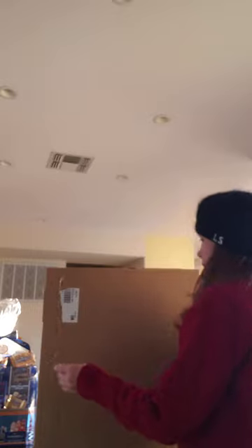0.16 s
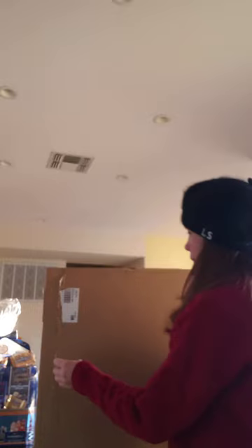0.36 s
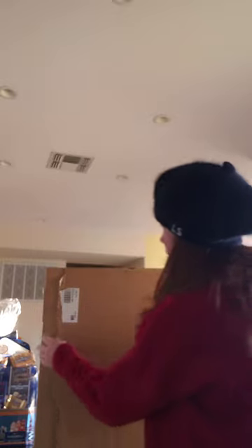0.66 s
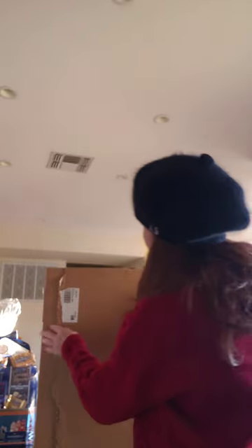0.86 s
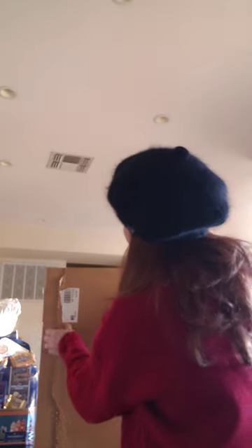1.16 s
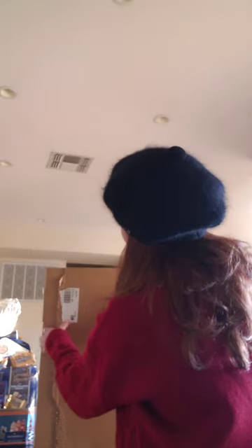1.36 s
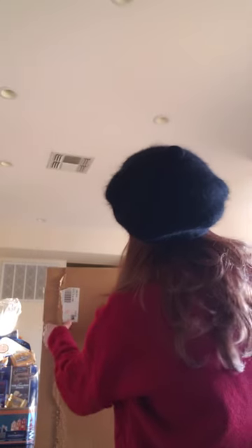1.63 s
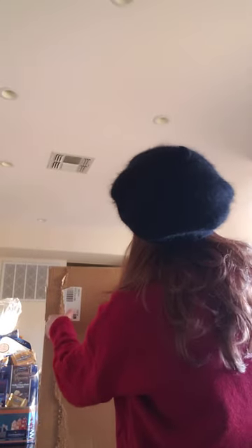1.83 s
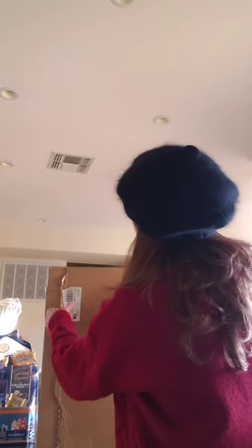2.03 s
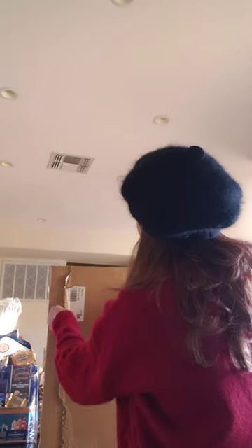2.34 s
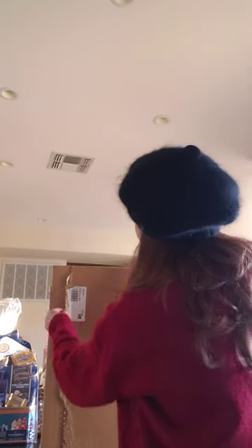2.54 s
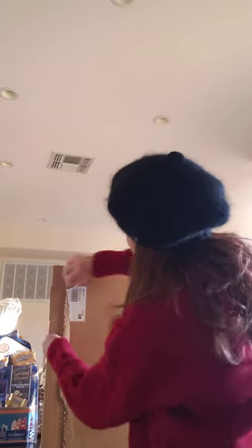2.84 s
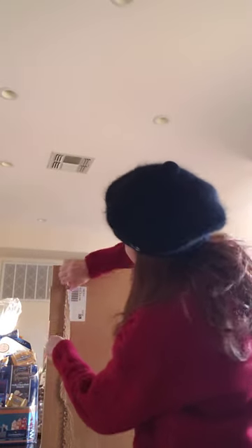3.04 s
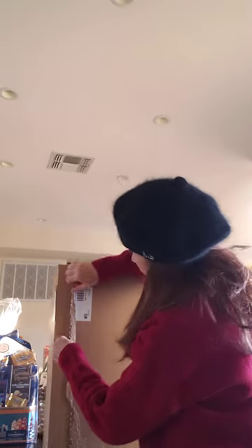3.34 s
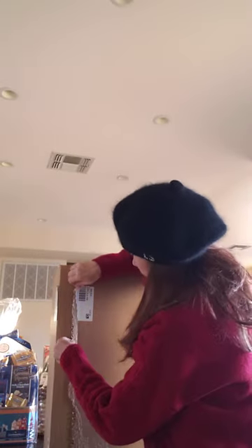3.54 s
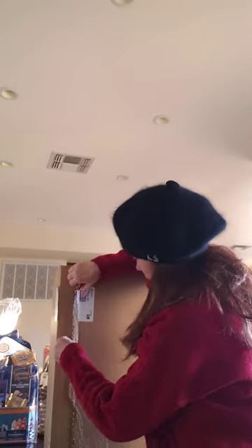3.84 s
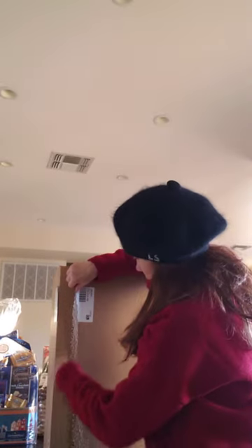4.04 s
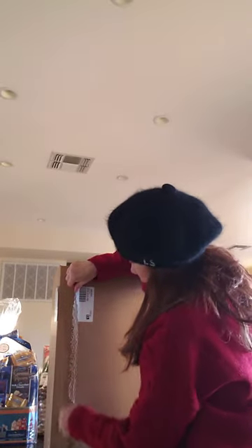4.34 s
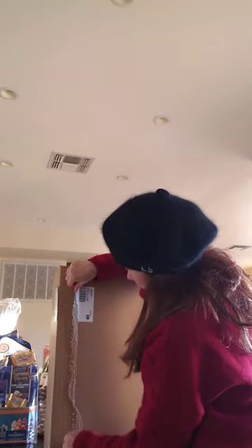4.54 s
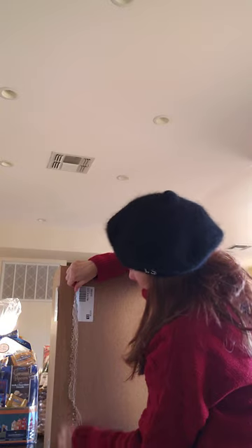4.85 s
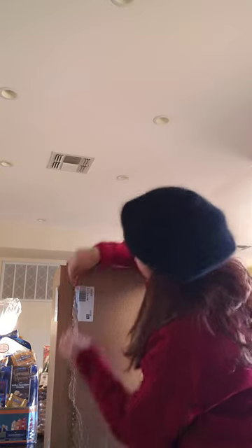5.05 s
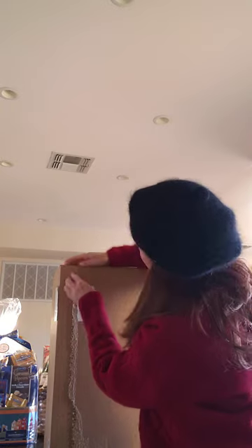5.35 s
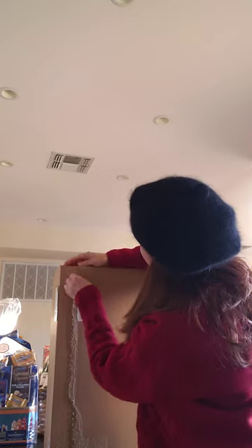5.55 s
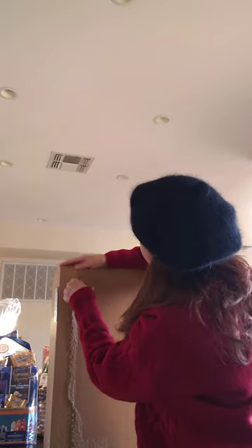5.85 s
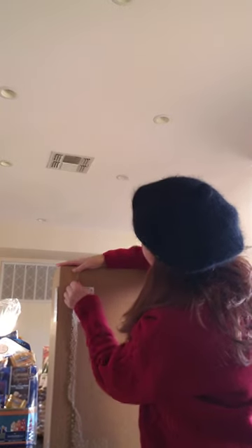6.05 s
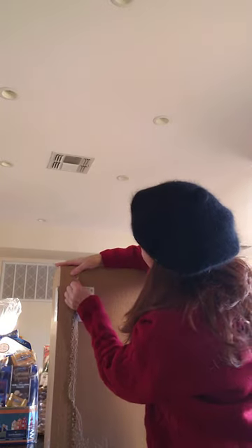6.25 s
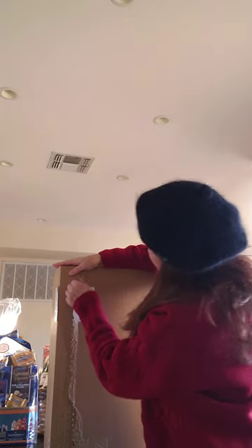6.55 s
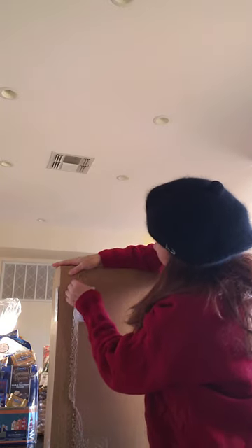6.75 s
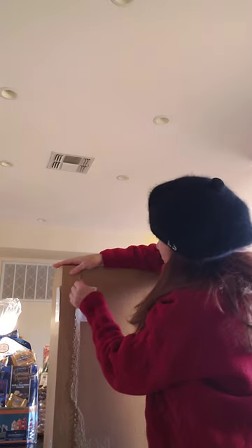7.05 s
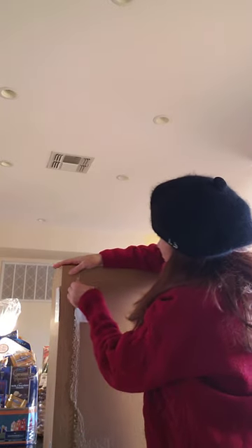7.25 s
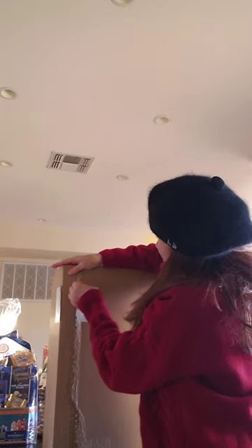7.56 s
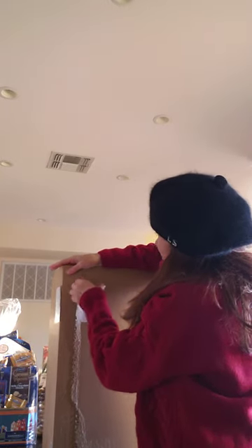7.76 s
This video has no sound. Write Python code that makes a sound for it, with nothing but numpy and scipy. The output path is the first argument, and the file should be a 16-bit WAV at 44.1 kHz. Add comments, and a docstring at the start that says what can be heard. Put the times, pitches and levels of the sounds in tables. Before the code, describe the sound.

Hands rip and scrape at a tall cardboard box indoors, a loud opening tear followed by picking rustles, tape snaps and hollow knocks.

```python
"""Hands rip, scrape and pick at a tall cardboard box: random stick-slip breaks, swelled per stroke,
fizz and hiss at the surface and ring the board and panels. Over it tape snaps as tick bursts, knocks
and pushes ring panel modes, and the shifting box rumbles. A hard, low-ceilinged room answers with
echoes and a tail over faint still-air noise; a phone with two microphone ports hears it from 2 m."""
import sys
import numpy as np
from scipy import signal
from scipy.fft import rfft, irfft, next_fast_len
from scipy.io import wavfile

SR = 44100
rng = np.random.default_rng(int(sys.argv[2]) if len(sys.argv) > 2 else 0)


def bounce(signal):
    """Save signal as a 16-bit WAV file at the path given by the first command-line argument."""
    frames = np.transpose(np.atleast_2d(signal))
    limited = np.clip(frames, -1, 1)
    pcm = np.round(limited * 32767).astype(np.int16)
    wavfile.write(sys.argv[1], SR, pcm)


N = 347949

# All table levels are relative: gains in the functions and the port colour come on top.
# still-room noise spectrum: [f/Hz, level/dB]
AIR_SPECTRUM = [(15, -28), (25, -29.5), (102, -3.5), (249, -12), (317, -19), (373, -14), (988, -32),
                (8360, -35), (16000, -20.5)]
AIR_RMS_DB = -74  # before the port colour
# early echoes off ceiling and walls: [t/s after the direct sound, level/dB]
ECHOES = [(.0055, -7.5), (.0062, -7), (.0075, -7), (.0105, -5), (0.0119, -11.5), (0.021, -27)]
# reverberation time: [f/Hz, t60/s]
ROOM_T60 = [(100, 0.41), (260, 0.45), (700, 0.49), (1840, 0.51), (4850, 0.053), (12800, 0.28)]
# likeness of room tail and air at the two ports: [f/Hz, likeness/0-1]
LIKENESS = [(60, .9), (290, 1), (640, 0.88), (1400, 0), (16000, 0)]
# colour of the microphone ports: [f/Hz, left level/dB, right level/dB]
PORTS = [(60, 3.5, 1), (396, 0, -0.5), (756, 6, 9), (1250, 3, -1), (2470, 5, 8), (3810, 1.5, 1.5),
         (5640, 5, 12.5), (7000, 0, -2), (7840, 4, -28.5), (7700, -3, -8.5), (9270, -2, 8),
         (11100, -1, -5.5), (16000, 8, 0.5), (16200, 3.5, -71.5), (15980, -43.5, -48.5)]
LEFT_LAG_S, EDGE_HZ = .0001, 16900

# resonances, all [f/Hz, width/Hz, level/dB]: bass rumble of the box
RUMBLE_MODES = [(56, 42, -10.5), (72, 66, 5)]
# air in the box [f/Hz, width/Hz, level/dB]
HOLLOW_MODES = [(268, 12, 0), (314, 16, -4)]
# flaps [f/Hz, width/Hz, level/dB]
FLAP_MODES = [(275, 41, 0.0049), (343, 270, 0.021)]
# large panel [f/Hz, width/Hz, level/dB]
BOOM_MODES = [(134.8, 4.1, -6.5), (160.4, 16, 3.5)]
# panels [f/Hz, width/Hz, level/dB]; knocks() widens them
PANEL_MODES = [(458, 9.4, 2), (514, 9.8, -5.5), (622, 54, -3.5), (814, 350, -6), (842, 250, 3),
               (989, 190, 6), (1178, 190, 8), (1331, 160, 4.5), (1563, 310, 1.5)]
# board under the fingers [f/Hz, width/Hz, level/dB]
BOARD_MODES = [(1495, 950, 12.5), (2060, 1700, 7), (2386, 1300, 2), (2900, 330, 8.5), (3700, 230, -22.5)]

# box shifting as a whole:
# [peak t/s, 20 dB rise/ms, 20 dB fall/ms, hollow level/dB, rumble level/dB]
HEAVES = [(0.121, 14, 243, -31, -58.0), (0.426, 163, 140, -38, -62), (1.17, 408, 302, -64.5, -60),
          (1.497, 109, 464, -66.5, -72), (1.996, 167, 336, -69.5, -63), (2.762, 475, 266, -71.5, -69.5),
          (2.985, 87, 127, -53, -56), (3.271, 149, 600, -68, -69.5), (3.52, 25, 206, -71, -70),
          (3.894, 34, 79, -58.5, -73.0), (4.092, 81, 138, -44.5, -45.5), (4.48, 183, 253, -59, -67),
          (4.917, 44, 80, -66.5, -77), (5.145, 121, 133, -75, -76), (5.389, 64.5, 445, -53.5, -57.5),
          (5.891, 48, 86, -62.5, -59), (6.37, 211, 600, -83, -69.5), (6.899, 600, 225, -71.5, -72),
          (7.068, 53, 421, -69, -68.5), (7.809, 304, 121, -58, -61.5)]
# pushes that make the large panel boom: [t/s, level/dB]
PUSHES = [(0.107, -43.5), (0.2, -47), (0.271, -51.5), (0.457, -60), (0.91, -62), (0.966, -57),
          (1.036, -53.5), (1.163, -47), (1.328, -50.5), (1.392, -53.5), (1.497, -57.5), (1.637, -59),
          (1.998, -53), (2.071, -71), (2.362, -62), (2.476, -56), (2.788, -60), (2.945, -47),
          (2.987, -48.5), (3.25, -57.5), (3.384, -70), (3.845, -63.5), (3.985, -54), (4.086, -38),
          (4.157, -46), (4.324, -61), (4.389, -57.5), (4.495, -58), (4.908, -68), (5.394, -46.5),
          (5.465, -46.5), (5.569, -62), (5.749, -63), (5.866, -51.5), (6.751, -64.5), (7.247, -63),
          (7.481, -62), (7.699, -55.5), (7.771, -50)]
# panel buckling or bumped: [t/s, level/dB, favoured pitch f/Hz]
KNOCKS = [(0.093, -19.5, 668), (0.793, -48.5, 780), (0.905, -49.5, 810), (0.939, -42.5, 778),
          (1.381, -47, 1680), (1.622, -37, 843), (2.704, -31, 780), (2.922, -43, 834), (3.019, -44.5, 845),
          (3.227, -43.5, 890), (3.28, -33.5, 1520), (3.398, -47.5, 856), (3.558, -45, 840),
          (3.879, -49, 430), (4.007, -44, 794), (4.902, -57, 580), (5.366, -37.5, 380), (5.811, -44, 1030),
          (6.454, -52.5, 2030), (7.054, -56, 1850), (7.147, -45, 856), (7.172, -41, 821), (7.68, -54, 820),
          (7.753, -46, 355)]
# tape and fibres letting go: [t/s, bright tick level/dB, dull tick level/dB re bright]
SNAPS = [(0.224, -22, -7), (0.8157, -31, -21), (0.9408, -29, -21), (1.6177, -36.5, -12),
         (2.6804, -28.5, -35), (2.6925, -34.5, -24), (2.7028, -4, -26), (3.2874, -32, -35),
         (3.3985, -28, -20), (3.5592, -8.5, -20.5), (3.8866, -32.5, -14.5), (4.1214, -38, 5),
         (4.153, -40, 4), (4.906, -25.5, -22.5), (5.0388, -23.5, -12.5), (5.0894, -21, -40),
         (5.0933, -14.5, -25.5), (5.3741, -31, -33), (5.549, -28, -6), (5.805, -35.5, -15),
         (6.4022, -22.5, -34), (6.4568, -24, -6.5), (6.5893, -18, -27), (6.597, -18, -27),
         (6.6, -16.5, -29), (6.6726, -34, -8.5), (6.98, -32, -12), (7.0545, -23.5, -25),
         (7.0778, -22.5, -25), (7.1491, -40.5, 6), (7.1707, -27.5, -1), (7.3034, -30.5, -29),
         (7.3112, -25, -30), (7.3898, -22, -18.5), (7.4735, -31.5, -17), (7.6776, -20.5, -25.5),
         (7.7006, -21, -27.5), (7.755, -18.5, -23.5)]
TATTER, TATTER_S = 0.28, 0.00059  # relative size and decay time of the small breaks after a snap
# hand strokes: [peak t/s, 20 dB rise/ms, 20 dB fall/ms, fizz level/dB, scrape level/dB, panel level/dB]
STROKES = [(0.07, 600, 20, -68, -80, -94), (0.1, 4.5, 166, -50, -23.5, -24),
           (0.227, 8.5, 74.5, -42.5, -36, -48), (0.25, 88, 163.5, -72, -37.5, -30),
           (0.473, 206, 85.5, -82, -68, -50), (0.797, 11.5, 115, -60.5, -65, -55.5),
           (0.948, 60, 52, -51, -67.5, -65), (1.008, 34, 52, -43, -50.5, -62),
           (1.036, 56, 95, -56, -46.5, -41.5), (1.126, 79.5, 90, -51, -50, -42.5),
           (1.339, 185, 129, -61, -85, -71), (1.382, 14, 75, -84, -70, -64),
           (1.489, 48.5, 68, -51, -67.5, -53), (1.622, 12, 111, -55, -50, -46),
           (1.734, 80, 33, -54.5, -60, -59), (1.93, 93.5, 58, -46, -61, -69),
           (2.008, 259, 95, -53.5, -56.5, -53), (2.387, 466.5, 79, -57.5, -68.5, -66),
           (2.522, 110, 236, -58, -76.5, -66), (2.698, 87.5, 25, -46.5, -61, -53.5),
           (2.708, 9, 206, -41, -50, -43.5), (2.917, 18, 208, -59, -63, -48.5),
           (3.033, 65, 99, -56.5, -62.5, -51), (3.202, 165, 42, -62.5, -72, -85),
           (3.229, 3, 30, -70, -57.5, -57), (3.285, 12.5, 57, -55, -53, -58),
           (3.55, 604, 600, -54.5, -64.5, -58), (3.562, 1, 50, -43, -53.5, -57),
           (4.064, 97, 191, -40.5, -51, -43.5), (4.195, 160, 64, -56, -55, -46.5),
           (4.442, 575, 155, -49.5, -72, -58.5), (4.58, 313, 60.5, -59.5, -62, -54),
           (4.681, 56.5, 42.5, -59, -69.5, -62), (4.908, 24, 98.5, -58.5, -65, -65),
           (5.095, 174, 195, -52.0, -64.5, -64), (5.364, 13, 347, -58, -70, -50),
           (5.502, 74, 112, -50, -43.5, -40.5), (5.552, 12, 28, -58, -54, -52),
           (5.812, 8, 42, -55, -69, -64), (5.896, 385, 62, -48.0, -55.5, -53.5),
           (6.114, 159, 430, -54.0, -71, -67.5), (6.312, 108, 320, -49, -61, -62),
           (6.46, 6, 32, -51.5, -53, -73), (6.496, 226, 52, -48.5, -58.5, -62.5),
           (6.604, 31, 202.5, -51.5, -72, -68), (6.676, 5, 53, -55.5, -70, -86),
           (6.76, 38, 499, -60, -72, -78), (6.9, 418, 583, -54.5, -72.5, -72),
           (7.07, 19, 55, -47.5, -54.5, -52.5), (7.152, 7, 40, -54, -59, -56),
           (7.172, 108, 177, -55.5, -54.5, -52), (7.306, 10.5, 72, -53.5, -62, -64),
           (7.393, 7.5, 69.5, -49.5, -64, -72), (7.48, 298, 334.5, -51.5, -67.5, -68),
           (7.69, 24, 607, -52.0, -72, -60), (7.756, 5, 52, -55.5, -55.5, -47)]
HISS_SHARE = 0.41  # hiss lies between fizz and scrape: weight of scrape in dB


def amp(db):
    """Decibels to gain."""
    return 10 ** (np.asarray(db) / 20)


def evened(x):
    """Scaled to rms 1."""
    return x / np.sqrt(np.mean(x ** 2) + 1e-20)


def read(f, value, hz):
    """Table over frequency, joined on a log axis."""
    return np.interp(np.log(hz + 1), np.log(np.asarray(f) + 1), value)


def high(x, cut_hz):
    """High-pass."""
    return signal.sosfilt(signal.butter(3, cut_hz, "high", fs=SR, output="sos"), x)


def band(x, low_hz, top_hz):
    """Band-pass."""
    return signal.sosfilt(signal.butter(3, [low_hz, top_hz], "band", fs=SR, output="sos"), x)


def ring(modes):
    """Impulse response of decaying modes, energy 1; little radiates far below the first."""
    t = np.arange(8192) / SR
    h = np.zeros(len(t))
    for hz, width_hz, db in modes:
        decay = np.exp(-np.pi * width_hz * t)
        h += amp(db) * np.sqrt(width_hz) * decay * np.sin(2 * np.pi * hz * t)
    h = high(h, .72 * modes[0][0])
    return h / np.linalg.norm(h)


def rung(x, modes):
    """A two-port force passed through resonant modes."""
    return signal.oaconvolve(x, ring(modes)[None])[:, :N]


def swells(rows, hop=64):
    """Rows rise and fall at steady dB rates; powers add. One gain curve per level column."""
    peak_s, rise_ms, fall_ms, *levels_db = np.transpose(rows)[:, :, None]
    after_ms = 1000 * (np.arange(0, N + hop, hop) / SR - peak_s)
    rising = -after_ms / np.maximum(abs(rise_ms), 1)
    falling = after_ms / np.maximum(fall_ms, 1)
    shape_db = -20 * np.where(after_ms < 0, rising, falling)
    curves = []
    for db in levels_db:
        gain = np.sqrt((amp(shape_db + db) ** 2).sum(0))
        curves.append(np.interp(np.arange(N) / hop, np.arange(len(gain)), gain))
    return curves


def alike(a, b, hz):
    """Left and right spectra that agree in the bass and part in the treble."""
    same = np.clip(read(*np.transpose(LIKENESS), hz), 0, 1)
    return np.array([a, same * a + np.sqrt(1 - same ** 2) * b])


def air():
    """Faint noise of the still room and the microphones: shaped Gaussian noise."""
    hz = np.fft.rfftfreq(N, 1 / SR)
    left, right = rfft(rng.standard_normal((2, N)))
    spectra = alike(left, right, hz) * amp(read(*np.transpose(AIR_SPECTRUM), hz))
    return amp(AIR_RMS_DB) * evened(irfft(spectra, N))


def response(tail_db=-8.0, wander_s=.0004):
    """From one spot on the box: early echoes, then a tail of sparse taps, each band fading at its t60."""
    taps = np.zeros((2, SR))
    at = np.arange(300, SR - 20, 20) + rng.integers(0, 20, (2, (SR - 301) // 20))
    np.put_along_axis(taps, at, rng.choice([-1., 1.], at.shape), 1)
    hz, t, (a, b) = signal.stft(taps, SR, nperseg=512)
    fade_db = -60 * t[:, None] / read(*np.transpose(ROOM_T60), hz)
    spectra = alike(a.T, b.T, hz) * amp(fade_db)
    out = signal.istft(spectra, SR, nperseg=512, time_axis=1, freq_axis=2)[1]
    out *= amp(tail_db) / np.linalg.norm(out[0])
    # shift moves an echo at both ports, skew parts them
    for (s, db), (shift, skew) in zip(ECHOES, rng.uniform(-1, 1, (len(ECHOES), 2))):
        at_s = s + wander_s * (shift + np.array([skew, -skew]) / 2)
        out[[0, 1], np.round(at_s * SR).astype(int)] += amp(db)
    return high(out, 200)


def room(x, count=4, hop=1024):
    """The hands wander between spots on the box, each with its own path into the room."""
    spot = np.cumsum(rng.standard_normal(N // hop + 2)) * 0.605
    spot = np.interp(np.arange(N) / hop, np.arange(len(spot)), spot)
    out = np.zeros((2, N))
    for k in range(count):
        away = (spot - k + count / 2) % count - count / 2  # spots lie on a circle
        share = np.cos(np.pi / 2 * np.clip(away, -1, 1))
        out += signal.fftconvolve((x * share)[None], response(), axes=1)[:, :N]
    return out


def shifting():
    """Uneven drag shakes the air in the box, flaps and largest panels; nearly alike at both ports."""
    hollow, rumble = swells(HEAVES)
    drag = rng.standard_normal(N) + 0.13 * rng.standard_normal((2, N))
    out = amp(-6.0) * rung(hollow * drag, HOLLOW_MODES)
    out += amp(-8.0) * rung(hollow * drag, FLAP_MODES)
    out += amp(-2.0) * rung(rumble * drag, BOOM_MODES)
    return out + amp(-1.0) * rung(rumble * drag, RUMBLE_MODES)


def booms():
    """Each push swells and fades at the pitch of the large panel, which then rings out."""
    swell_s, lead_s = .07, .02  # push length; start ahead of the table time
    t = np.arange(round(swell_s * SR)) / SR
    push = np.sin(np.pi * t / swell_s) ** 2 * np.sin(2 * np.pi * BOOM_MODES[0][0] * t)
    force = np.zeros(N + SR)
    for s, db in PUSHES:
        force[round((s - lead_s) * SR):][:len(t)] += amp(db) * push
    return amp(-22.5) * signal.oaconvolve(force, ring(BOOM_MODES))[:N]


def knocks():
    """A short ragged blow rings the panel modes, favouring those near its own pitch."""
    out = np.zeros(N + 9000)
    fade = np.exp(-np.arange(800) / SR / 0.0051)
    for (s, db, pitch_hz), blow in zip(KNOCKS, rng.standard_normal((len(KNOCKS), 800))):
        modes = [(hz, width_hz + 20, level_db - 26.0 * np.log2(hz / pitch_hz) ** 2)
                 for hz, width_hz, level_db in PANEL_MODES]
        sound = np.convolve(blow * fade, ring(modes)[:4000])
        out[round(s * SR):][:len(sound)] += amp(db + 13.0) * sound / np.linalg.norm(sound)
    return out[:N]


def snaps():
    """One sharp break, then a tatter of smaller ones that dies away."""
    bright, dull = np.zeros((2, N + 800))
    t = np.arange(800) / SR
    for (s, db, dull_db), tatter in zip(SNAPS, rng.standard_normal((len(SNAPS), 800))):
        burst = amp(db) * ((t == 0) + TATTER * tatter * np.exp(-t / TATTER_S))
        bright[round(s * SR):][:800] += burst
        dull[round(s * SR):][:800] += amp(dull_db) * burst
    return (amp(9.0) * high(bright, 12000) + amp(20.0) * band(dull, 2910, 7000))[:N]


def grains(per_s, spread_db, smooth):
    """Stick-slip: tiny uneven breaks over rubbing noise along the seam, which each port hears apart."""
    starts = rng.exponential(1, N) * (rng.random(N) < 60 / SR)  # 60 runs per s
    runs = signal.lfilter([1], [1, -np.exp(-1 / (.012 * SR))], starts)  # start at once, die away
    clumps = 1 + 1.2 * runs
    size = amp(spread_db * np.minimum(rng.exponential(1, N), 5)) * rng.choice([-1., 1.], N)
    breaks = evened(clumps * size * (rng.random(N) < per_s / SR))
    return evened(breaks + smooth * rng.standard_normal((2, N)))


def rubbing():
    """The same slips fizz and hiss at the surface and shake the board and the panels."""
    fizz, scrape, panel = swells(STROKES)
    hiss = fizz ** (1 - HISS_SHARE) * scrape ** HISS_SHARE
    slips = grains(per_s=5000, spread_db=5.0, smooth=0.69)
    out = amp(6.0) * high(fizz * slips, 10300)
    out += amp(6.0) * band(hiss * slips, 4370, 7100)
    out += amp(-2.0) * rung(scrape * slips, BOARD_MODES)
    return out + amp(-3.5) * rung(panel * slips, PANEL_MODES)


def scene():
    """Direct sound, room and still air; the thin ticks beam forward and reach the walls weaker."""
    box, ticks = rubbing() + knocks(), snaps()
    walls = room(box[0] + amp(-7.0) * ticks)
    return box + shifting() + booms() + ticks + walls + air()


def record(dry):
    """Each port has its own colour, the left hears a little later; then the band limit."""
    size = next_fast_len(N + 2048)
    hz = np.fft.rfftfreq(size, 1 / SR)
    f, left_db, right_db = np.transpose(PORTS)
    colour = amp([read(f, left_db, hz), read(f, right_db, hz)])
    lag = np.exp(-2j * np.pi * hz * [[LEFT_LAG_S], [0]])
    heard = irfft(rfft(dry, size) * colour * lag, size)[:, :N]
    low_pass = signal.firwin(511, EDGE_HZ, window=("kaiser", 9), fs=SR)
    return signal.oaconvolve(heard, low_pass[None], "same")


dry = scene()
out = record(dry)
bounce(out)
```